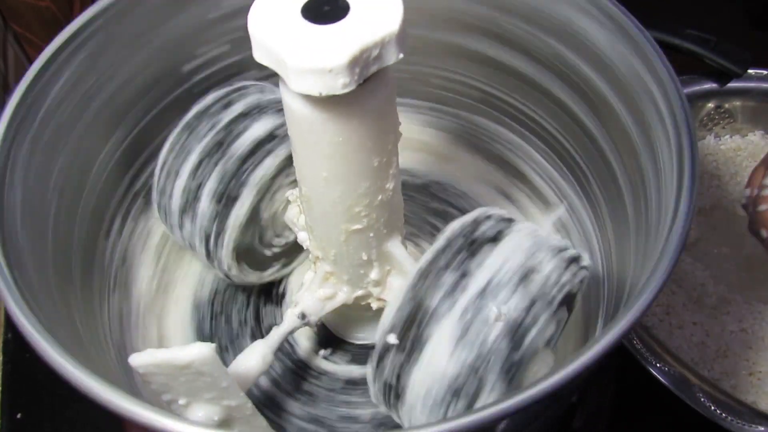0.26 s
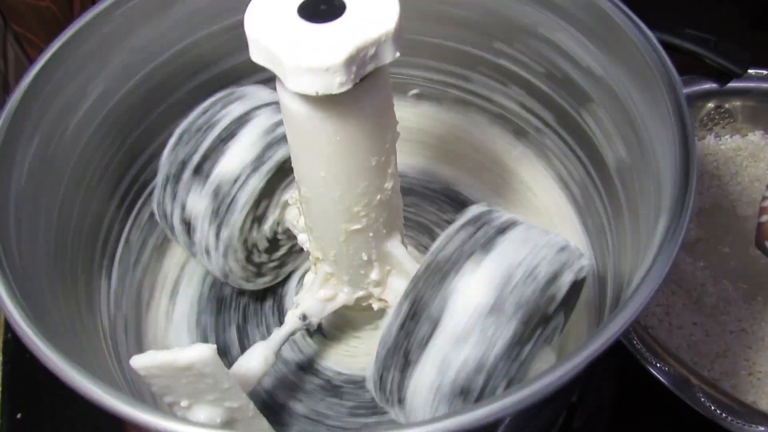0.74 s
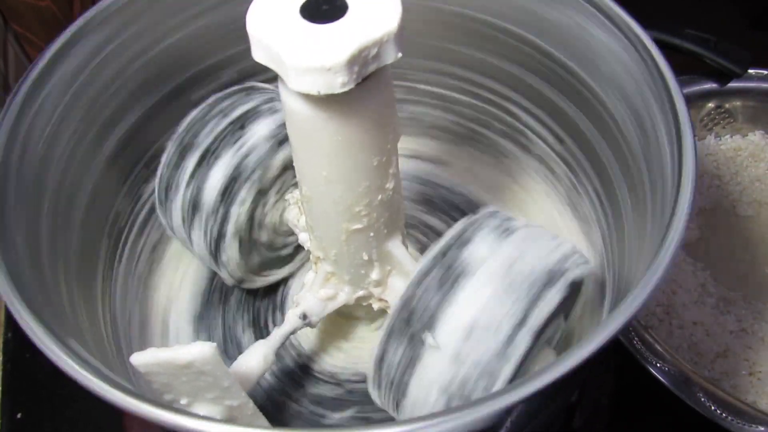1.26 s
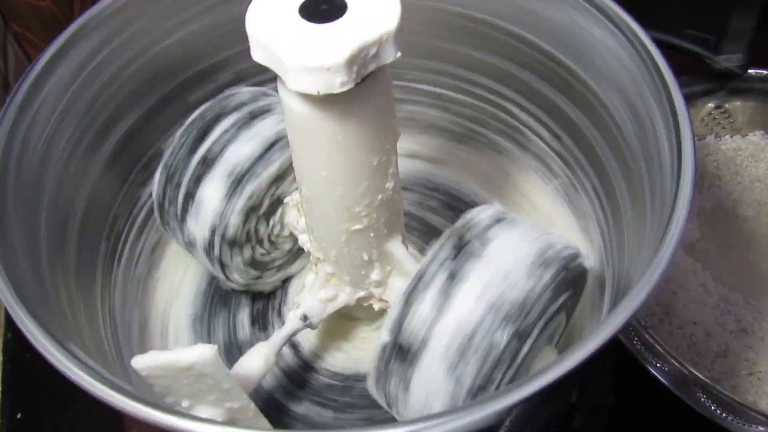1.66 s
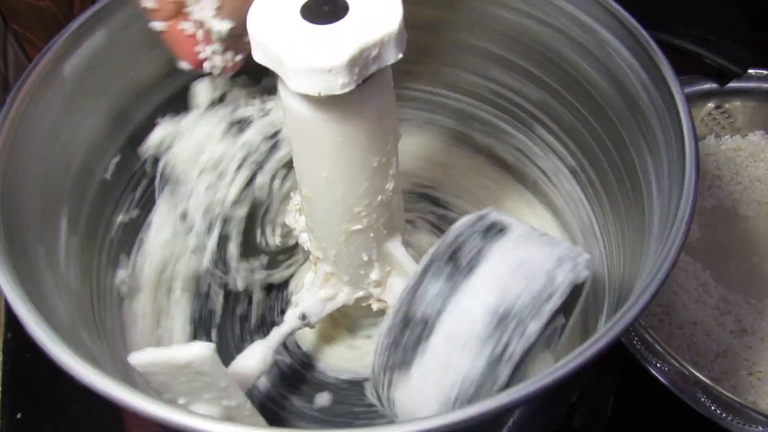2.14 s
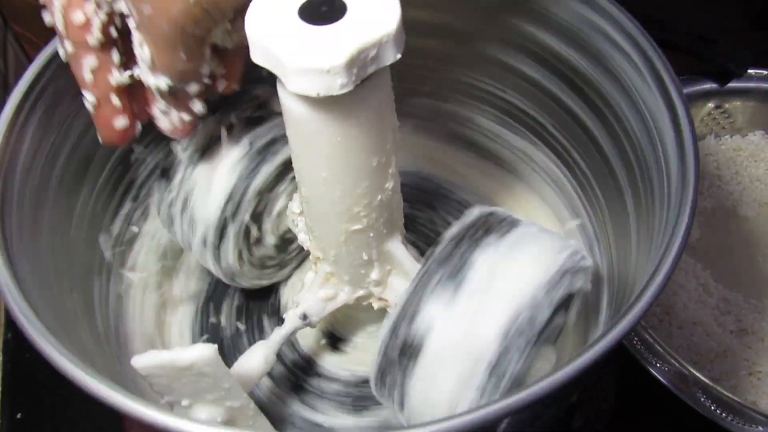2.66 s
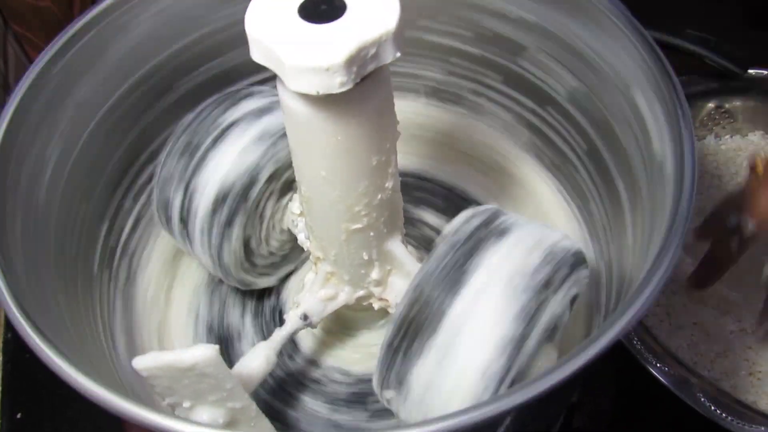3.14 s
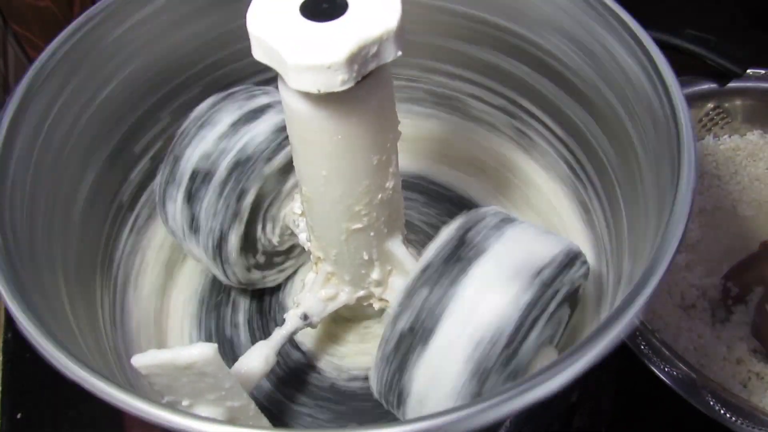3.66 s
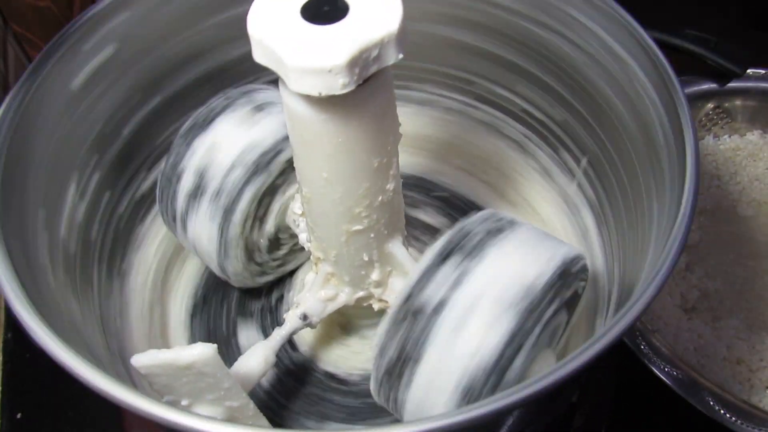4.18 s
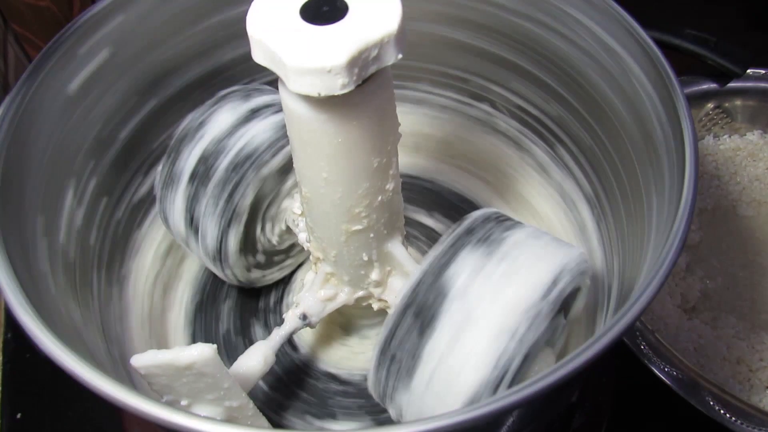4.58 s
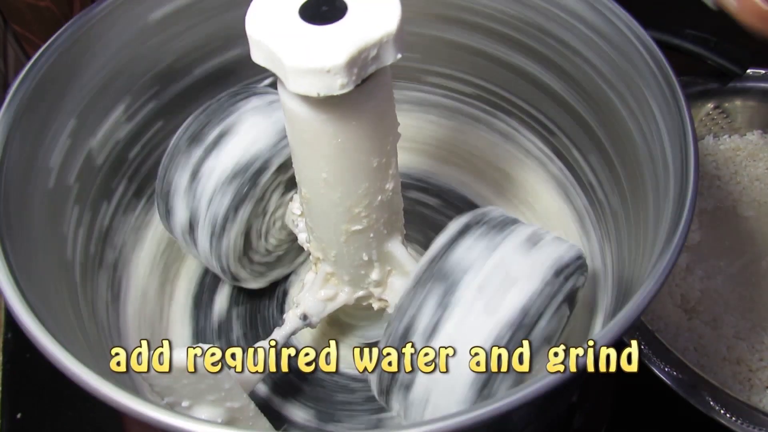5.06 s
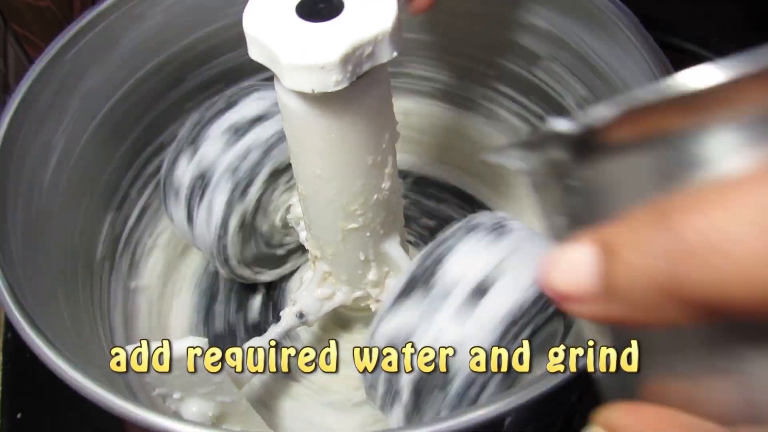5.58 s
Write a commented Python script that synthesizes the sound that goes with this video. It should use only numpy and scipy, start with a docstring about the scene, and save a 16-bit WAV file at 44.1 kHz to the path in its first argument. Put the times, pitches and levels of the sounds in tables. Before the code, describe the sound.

An electric grinder already running, heard from close by with the drum's short steely ring. Stone rollers rumble and knock over lumps, grains crack irregularly and batter hisses with small spits. Two short showers of rice land around 2.1 to 2.4 seconds, another pair near 5.3. The shaft throb weakens midway; a short, rough steel squeal arrives near the end, then grinding continues to the cut.

```python
"""A tabletop wet grinder in a kitchen: from the start a motor hums while stone rollers bump over soaked rice.
Once a turn the rumble swells; until about 5 s a clot also spits each turn. Noise impacts ring the drum as
loose grains crack, and dense fine grains make the batter hiss. Handfuls of rice patter in as filtered
impacts near 2.1-2.4 s and 5.3-5.4 s; from 3.4 s the shaft throb sinks.
At 5.55 s a steel cup brushes the spinning drum and squeals by stick-slip, until just before the end."""
import sys
import numpy as np
from scipy import signal
from scipy.fft import rfft, irfft, next_fast_len
from scipy.io import wavfile
from scipy.ndimage import uniform_filter1d, map_coordinates

SR = 44100
rng = np.random.default_rng(int(sys.argv[2]) if len(sys.argv) > 2 else 0)


def pcm_store(signal):
    """Save signal as 16-bit PCM."""
    levels = np.round(np.clip(np.atleast_2d(signal), -1, 1) * 32767)
    wavfile.write(sys.argv[1], SR, levels.astype(np.int16).T)


N = 256750
TIME = np.arange(N) / SR
SHAFT_HZ, TURN_HZ = 24.42, 2.478  # motor shaft, drum
TOP_HZ = 15800  # upper band limit

# how much rice and batter is under the stones: [t/s, crunch level before trim/dB, wet hiss level/dB]
GRIND = [(0.0, -35.5, -45.5), (0.2, -35.5, -45.5), (0.67, -33.5, -46), (1.13, -38.5, -49),
         (2.07, -34, -42.5), (2.22, -33, -39), (2.9, -35.5, -41.5), (3.28, -33.5, -41.5), (4.78, -36, -41),
         (5.24, -32, -42), (5.5, -33, -40.5)]
# colour of the struck steel drum: [f/Hz, relative level/dB]
DRUM = [(410, -27), (690, -12.5), (761, -3), (879, 2), (1070, -7.5), (1250, -3.5), (1360, -1.5), (1540, -7),
        (1790, -6.5), (2400, -11.5), (2730, -19.5), (3200, -20), (3450, -24), (4200, -22.5), (5460, -28),
        (9240, -120)]


def amp(db):
    """Decibels to gain."""
    return np.exp(np.asarray(db) * (np.log(10) / 20))


def unit(x):
    """Scale to rms 1."""
    return x / np.sqrt(np.mean(x ** 2) + 1e-20)


def along(points, hz):
    """Read (f/Hz, value) points on a log frequency axis."""
    f, v = np.transpose(points)
    return np.interp(np.log(hz + 1), np.log(f + 1), v)


def curves(rows):
    """One value per sample for each column after the time."""
    s, *cols = np.transpose(rows)
    return [np.interp(TIME, s, c) for c in cols]


def wobble(rate):
    """A smooth random curve, about rate knots a second."""
    knots = rng.standard_normal(int(N * rate / SR) + 4)
    steps = np.linspace(0, len(knots) - 1, 10 * len(knots))
    return np.interp(TIME * rate, steps, map_coordinates(knots, [steps]))


def filtered(x, response):
    """Multiply the spectrum of x by a complex response of frequency."""
    m = next_fast_len(N + SR // 4, True)
    return irfft(rfft(x, m) * response(np.fft.rfftfreq(m, 1 / SR)), m)[..., :N]


def ring(x, spectrum, size=4096):
    """Pass x through a causal, minimum-phase body with this spectrum."""
    gain = amp(along(spectrum, np.fft.rfftfreq(size, 1 / SR)))
    cepstrum = irfft(np.log(np.maximum(gain, 1e-6)))
    # folding the cepstrum onto positive time makes the body respond at once
    fold = np.r_[1, np.full(size // 2 - 1, 2), 1, np.zeros(size // 2 - 1)]
    body = irfft(np.exp(rfft(cepstrum * fold)))
    return signal.oaconvolve(x, body)[:len(x)]


def modes(x, table):
    """Pass x through a bank of resonances of alternating sign: [f/Hz, width/Hz, level/dB]."""
    def response(f):
        total = 0
        for k, (centre, width, db) in enumerate(table):
            damping = 1j * f * width
            total = total + (-1) ** k * amp(db) * damping / (centre * centre - f * f + damping)
        return total
    return filtered(x, response)


def later(x, s):
    """Delay x by s seconds."""
    return np.pad(x, (round(s * SR), 0))[:N]


def grains(rate, reach_db):
    """Random tiny impacts of either sign, rate a second, sizes spread evenly over +-reach_db."""
    chance, side, size = rng.random((int(rate * N / SR), 3)).T
    impact = np.sign(side - .5) * amp(reach_db * (2 * size - 1))
    return np.bincount((chance * N).astype(int), impact, N)


def even(x, span):
    """Hold the rms near 1 over about span seconds, keeping the faster grain."""
    width = int(span * SR)
    power = uniform_filter1d(uniform_filter1d(x ** 2, width), width)
    return x / np.sqrt(np.abs(power) + 1e-12)


def add(track, s, db, t60, spectrum, snap, snap_t60=0.013):
    """Add one impact peaking at db: a first snap and a dying crumble of contacts, coloured by a body."""
    t = np.arange(SR // 4) / SR
    decay = amp(-60 * t / t60) + snap * amp(-60 * t / snap_t60)
    hit = ring(decay * rng.choice([-1, 1], len(t)), spectrum)
    place = track[round(s * SR):][:len(t)]
    place += (amp(db) * hit / np.abs(hit).max())[:len(place)]


def motor(hum_trim_db=-1, belt_trim_db=-1, waver_rad=0.026, slip_rad=1.6, table_db=-42):
    """Magnetic hum at twice the mains, a throb at twice the shaft speed, a wavering belt tone, a shaking tabletop."""
    mains_hz, belt_hz = 49.96, 70.2
    # motor tones: [t/s, hum level before trim/dB, shaft level/dB, drive belt level before trim/dB]
    motor_levels = [(0, -27.5, -41, -42), (.85, -27, -40, -40), (1.05, -30, -41, -43),
                    (2.3, -27.5, -40, -40), (2.7, -31, -41, -43), (3.4, -27.5, -40, -39),
                    (3.8, -27.5, -51, -38), (4.8, -27, -52, -34), (5.45, -27.5, -52, -38),
                    (5.82, -37, -56, -39)]
    # magnetic hum: [multiple of twice the mains frequency, relative level/dB]
    hum_partials = [(1, 0), (2, -3.5), (3, -5.5), (4, -1)]
    # tabletop colour: [f/Hz, relative level/dB]
    tabletop = [(15, -19), (30, -14), (55, 6.5), (90, 6.5), (130, 3.5), (200, -24), (600, -51)]
    hum_db, shaft_db, belt_db = curves(motor_levels)

    def tone(hz, drift_rad):
        """An rms-1 sine with a wandering phase."""
        cycles = hz * TIME + rng.random()
        return np.sqrt(2) * np.sin(2 * np.pi * cycles + drift_rad * wobble(11))

    hum = sum(amp(db) * tone(2 * mains_hz * round(k), waver_rad) for k, db in hum_partials)
    throb = amp(shaft_db) * tone(2 * SHAFT_HZ, waver_rad)
    belt = amp(belt_db + belt_trim_db) * tone(belt_hz, slip_rad)
    shaking = amp(table_db) * unit(ring(rng.standard_normal(N), tabletop))
    return amp(hum_db + hum_trim_db) * hum + throb + belt + shaking


def rollers(rumble_trim_db=-1.42, lump_trim_db=-1, uneven_db=1.38, rumble_growth=0.84,
            thump_t60=0.027, boom_trim_db=-7.0, boom_growth=1.8):
    """The stones bump over countless grains and shake the housing, harder once a turn and on every lump."""
    # roller pressure, light after crushing a big lump: [t/s, rumble level before trim and growth/dB]
    pressing = [(0.0, -20.5), (0.88, -18.7), (0.94, -24.5), (1.5, -22), (2.0, -19.5), (2.47, -19),
                (2.54, -22.5), (3.1, -19), (4.3, -19.5), (5.3, -18.5), (5.82, -22)]
    # a roller climbs a lump and drops off it with a thump:
    # [t of the drop/s, rumble level before trim and growth/dB, climb/s, thump peak level/dB]
    lumps = [(0.03, -16, 0.017, -16), (0.414, -15.5, .015, -18), (.834, -19, 0.0043, -9),
             (.892, -10, 0.0036, -3.5), (1.774, -15, 0.0044, -14), (1.924, -19, .005, -10),
             (2.236, -14.5, .06, -19), (2.483, -14, 0.08, -22), (2.773, -14, 0.0044, -12),
             (2.883, -13, 0.022, -17), (3.225, -15, .007, -12), (4.044, -13.5, 0.028, -17),
             (4.464, -16.5, 0.032, -9), (4.783, -10.5, 0.0085, -19), (4.914, -15, 0.015, -21),
             (5.289, -18.5, .024, -24), (5.354, -27, .03, -11)]
    # housing colour and thump colour: [f/Hz, relative level/dB]
    housing = [(74, -53.5), (125, -8.5), (134, -28.5), (154, -7.5), (189, -0.5), (205, -0.5), (269, -9.5),
               (307, -6), (352, -4), (394, -8), (408, -7), (519, -24), (590, -22), (680, -41), (880, -80.5),
               (1500, -120)]
    thud = [(110, -39.5), (185, -4), (330, 6), (420, -13.5), (600, -46), (1200, -65)]
    # once a turn the thick side of the batter passes under: first pass (s), swell before growth (dB), narrowness
    swell_s, swell_db, swell_sharp = 0.049, 2, 0.53
    drop_s = 0.008  # the rumble of a lump dies this fast after the drop

    load_db, = curves(pressing)
    turn = np.cos(2 * np.pi * TURN_HZ * (TIME - swell_s))
    swell = swell_db * np.exp(swell_sharp * (turn - 1))
    power = amp(load_db + swell + uneven_db * wobble(32)) ** 2
    for s, db, climb, _ in lumps:
        ride = (TIME - s) / np.where(TIME < s, climb, drop_s)
        power += amp(db + lump_trim_db) ** 2 * np.exp(-np.minimum(ride ** 2, 100))
    level = 10 * np.log10(power)
    usual = level.mean()
    surge = level - usual

    rumble = even(ring(grains(rate=500, reach_db=8), housing), span=0.031)
    sound = amp(usual + rumble_trim_db + rumble_growth * surge) * rumble
    # heavy bumps set the housing booming, more than in proportion
    boom_modes = [(167.0, 8.0, -5.0), (196.8, 7.9, 1.5)]  # [f/Hz, width/Hz, relative level/dB]
    boom = even(modes(grains(rate=300, reach_db=7), boom_modes), span=0.04)
    sound += amp(usual + boom_trim_db + boom_growth * surge) * boom
    for s, _, _, db in lumps:
        add(sound, s, db, thump_t60, thud, snap=0.32)
    return sound


def bursts():
    """Every burst under the stones, from loose grains and from a clot that meets a stone once a turn."""
    # loose grains burst: [t/s, crack peak level/dB, spit peak level before trim/dB, t60/s]
    loose = [(.026, -20.5, -33, 0.054), (.066, -17, -32, 0.098), (.31, -23, -25.5, .07),
             (.432, -19, -37, .09), (.596, -20.5, -36, .08), (.753, -18, -34, 0.041), (.823, -25, -26, .08),
             (.832, -17.5, -36, 0.12), (1.155, -22, -42, 0.065), (1.438, -20, -30, 0.046),
             (1.604, -21, -44, .095), (1.629, -22, -27, .06), (2.225, -14.5, -29, .055),
             (2.589, -27, -18.5, .055), (2.854, -19.5, -39, 0.11), (2.925, -20.5, -30, .075),
             (3.424, -22.5, -34, .08), (3.444, -18, -31, 0.14), (4.265, -20, -20, 0.099),
             (4.45, -14, -27.5, 0.11), (5.072, -36, -28, .05), (5.778, -18, -40, 0.11),
             (5.793, -15.5, -36, 0.1)]
    # strength of the clot, one value a turn: [crack peak level/dB]
    clot_levels = [-18.5, -17, -24.5, -17, -18, -21, -26, -25, -19.5, -18, -21, -35, -24]
    # first meeting (s), decay (s), spit over crack before trim (dB)
    clot_s, clot_t60, clot_spit_db = .145, 0.11, -6.5
    clot = [(clot_s + turn / TURN_HZ, db, db + clot_spit_db, clot_t60)
            for turn, db in enumerate(clot_levels)]
    return list(loose) + clot


def crunch(bed_trim_db=-1.66, clump_db=1.5, wall_db=1, knock_db=10, knock_t60=0.047):
    """Breaking rice rings the steel drum, in clumps and pulsing with the shaft."""
    # the drum wall's resonances: [f/Hz, width/Hz, level before wall gain/dB]
    wall_modes = [(784, 3.8, 5.5), (874.5, 6.3, 1.5), (887, 10, 5), (1017, 5.6, 3.5), (1360, 7, -24),
                  (1396, 16, 2), (1620, 26, -15), (1755, 26, -1.5), (2080, 14, 1), (3298, 36, 4.5)]
    level, _ = curves(GRIND)
    shake, snap = .16, .7  # depth of the shaft pulse, strength of the first snap
    shaft = 2 * np.pi * SHAFT_HZ * TIME
    pulse = 1 + shake * (np.cos(shaft) + np.cos(2 * shaft))
    pressure = amp(clump_db * wobble(45)) * pulse
    bed = unit(ring(pressure * grains(rate=2600, reach_db=8), DRUM))
    sound = amp(level + bed_trim_db) * bed
    for s, db, _, t60 in bursts():
        add(sound, s, db, t60, DRUM, snap)
    # smaller grains give way at any moment, with a short knock
    for i, size in zip(rng.integers(N, size=70), rng.standard_normal(size=70)):
        add(sound, i / SR, level[i] + knock_db + 2 * size, knock_t60, DRUM, snap)
    # the steel rings on a moment after each contact
    return sound + amp(wall_db) * modes(later(sound, .005), wall_modes)


def batter(spit_trim_db=-1, clump_db=1.07, tick_db=-7, tick_t60=0.1, fizz_db=-9):
    """The wet film tears off the stones as a hiss with small ticks, and a spit now and then."""
    # colours of the film, the ticks and spits, and the top fizz: [f/Hz, relative level/dB]
    film_colour = [(1650, -11), (2800, 4.5), (3900, -1.5), (5010, 7), (5620, 1), (6400, 5), (6880, -0.5),
                   (7830, 3.5), (8530, 0.5), (9230, 5), (11000, 4), (14200, -2), (15600, -7.5)]
    splash = [(1500, -23), (3000, -2), (6000, 2), (9000, -1), (12000, -7), (16000, -22)]
    fizz_colour = [(4000, -25), (8000, -3), (11000, 0), (13500, -4), (16000, 14)]
    _, level = curves(GRIND)
    film = amp(clump_db * wobble(70)) * unit(ring(grains(rate=12000, reach_db=6), film_colour))
    tick_decay = amp(-60 * TIME[:SR // 8] / tick_t60)
    flecks = signal.oaconvolve(np.abs(grains(rate=25, reach_db=3)), tick_decay)[:N]
    ticks = unit(ring(flecks * rng.standard_normal(N), splash))
    sound = amp(level) * (film + amp(tick_db) * ticks)
    # a fuller drum hisses brighter: the fizz moves twice as far in dB
    fizz = amp(clump_db * wobble(120)) * unit(ring(grains(rate=9000, reach_db=8), fizz_colour))
    usual = level.mean()
    sound += amp(usual + fizz_db + 2 * (level - usual)) * fizz
    for s, _, db, t60 in bursts():
        add(sound, s, db + spit_trim_db, t60, splash, snap=0.11)
    return sound


def rice(clump_db=1.5):
    """Each handful is a short shower of wet grains, tiny impacts through one broad resonance."""
    # handfuls landing: [t/s, level/dB, half length/s, brightest f/Hz]
    handfuls = [(2.083, -35.5, 0.035, 6940), (2.25, -45, .08, 5850), (2.401, -34, 0.033, 5900),
                (5.337, -36, 0.04, 7700), (5.383, -33, 0.013, 3630)]
    sound = np.zeros(N)
    landings = grains(rate=2600, reach_db=10)
    for s, db, half, hz in handfuls:
        patter = unit(signal.lfilter(*signal.iirpeak(hz, 2, SR), landings))
        shower = np.exp(-.5 * np.minimum(((TIME - s) / half) ** 2, 100))
        sound += amp(db) * shower * patter
    return sound * amp(clump_db * wobble(120))


def cup(scrape_trim_db=-1, chatter_db=2, grit=0.47):
    """Steel sticks and slips: each slip kicks the cup's resonances, while a rough scrape rings the drum alongside."""
    # cup against drum: [t/s, slip rate f/Hz, squeal drive level/dB, scrape level before trim/dB]
    rub = [(5.55, 597.6, -100, -100), (5.558, 591, -19, -22), (5.565, 581, -18.5, -22),
           (5.577, 525.3, -20.5, -28), (5.597, 524, -19, -28), (5.62, 540, -22, -32),
           (5.652, 564.6, -21.5, -27), (5.67, 532, -17.5, -37), (5.688, 498, -25, -32),
           (5.705, 505, -25, -37), (5.74, 497, -50, -29), (5.77, 503, -100, -100)]
    # the cup's resonances: [f/Hz, width/Hz, relative level/dB]
    cup_modes = [(580, 93, 7), (1030, 170, -2), (1630, 120, -2.5), (2112, 31, 6.5), (2220, 68, 2),
                 (2685, 86, -9), (3260, 99, -5), (3286, 13, 0), (4210, 73, -17), (4470, 100, -10),
                 (4830, 110, -15), (5270, 270, -15), (6260, 510, -14), (7600, 1700, -17),
                 (10600, 4000, -19.5)]
    hz, squeal_db, scrape_db = curves(rub)
    jitter, uneven_db = .01, 2.5  # slip rate spread (fraction), limit of the overtone wander (dB)
    phase = 2 * np.pi * np.cumsum(hz * (1 + jitter * wobble(700))) / SR
    touching = TIME > rub[0][0]
    slips = np.zeros(N)
    # the contact point wanders, so the overtones come and go
    for k in range(1, int(TOP_HZ / hz.max())):
        wander = uneven_db * np.tanh(k / 10) * wobble(28)[touching]
        slips[touching] += amp(wander) * np.cos(k * phase[touching])
    slips /= np.std(slips[touching])
    # gritty noise pulses with each slip
    noise = grit * rng.standard_normal(N) * (1 + np.cos(phase))
    drive = amp(squeal_db + chatter_db * wobble(300)) * (slips + noise)
    squeal = np.std(drive) * unit(modes(drive, cup_modes))
    rasp = amp(scrape_db + scrape_trim_db) * unit(ring(grains(rate=3000, reach_db=8), DRUM))
    return squeal + rasp


def stereo(direct, scattered):
    """The direct sound leans left; what scatters round the drum widens the treble."""
    # scattered sound, opposite in left and right: [f/Hz, level/dB]
    width = [(400, -37), (900, -12), (2200, -15), (5000, -11.5), (9000, -6), (14000, -4)]
    # the two microphone ports differ: [f/Hz, left minus right level/dB]
    tilt = [(60, 2.4), (110, 2.9), (200, 2.7), (380, 4.34), (700, 3.6), (1300, 2.7), (2300, 1.8),
            (4400, 0.45), (14000, 1.3)]
    # phase by which left leads: [f/Hz, lead/rad]
    lead = [(50, 0.32), (110, 0.57), (200, 0.26), (1100, -0.45), (2000, -0.29), (7000, 0.44), (14000, 0.9)]
    side = filtered(scattered, lambda hz: amp(along(width, hz)))
    half = np.array([[.5], [-.5]])  # each port takes half the difference

    def ports(hz):
        return amp(half * along(tilt, hz)) * np.exp(1j * half * along(lead, hz))

    return filtered(np.array([direct + side, direct - side]), ports)


def scene():
    """The drum is close by; its wall echoes the steel sounds and scrambles the fine grain of the hiss."""
    steel = crunch() + cup()
    direct = motor() + rollers() + steel + batter() + rice()
    # batter and rice are drawn afresh, so their scattered grain differs from the direct one
    scattered = later(steel, 0.014) + batter() + rice()
    return stereo(direct, scattered)


def record(dry):
    """Cut everything above the band limit."""
    return filtered(dry, lambda hz: hz < TOP_HZ)


dry = scene()
out = record(dry)
pcm_store(out)
```